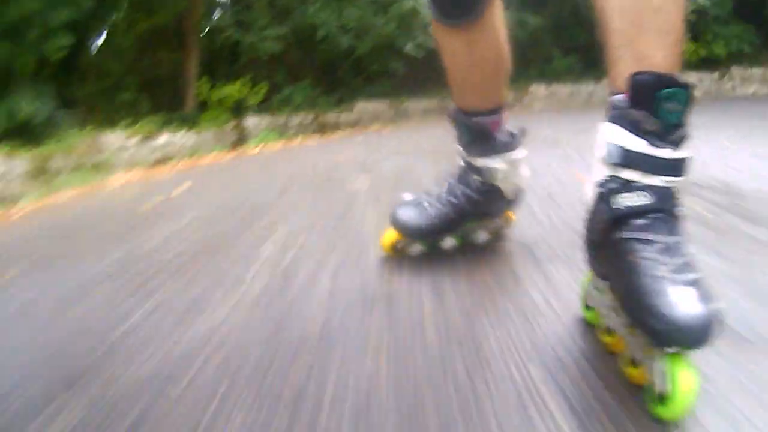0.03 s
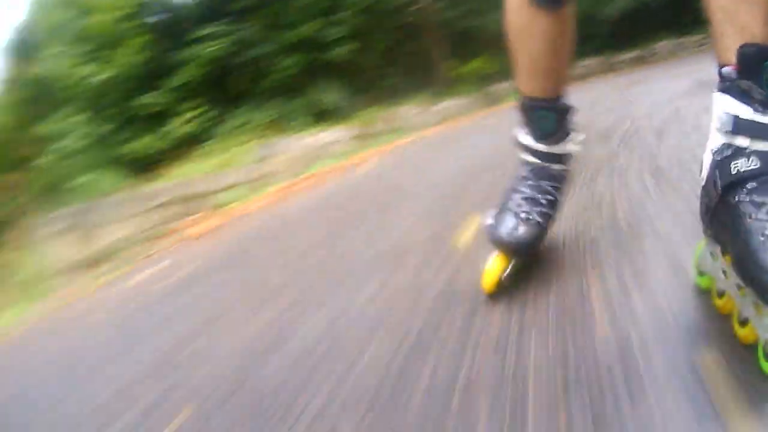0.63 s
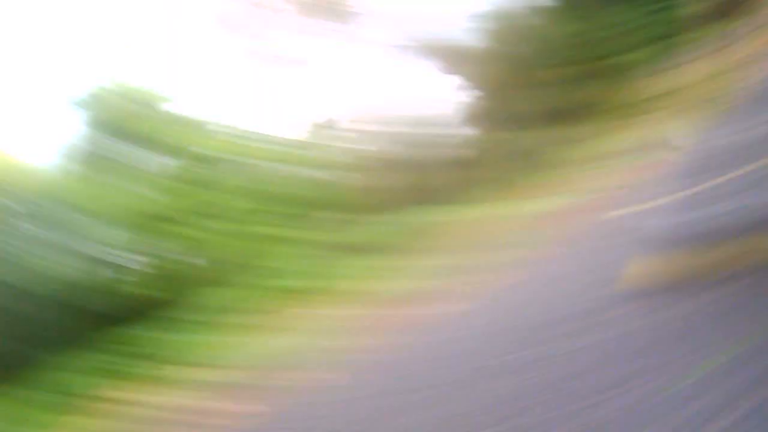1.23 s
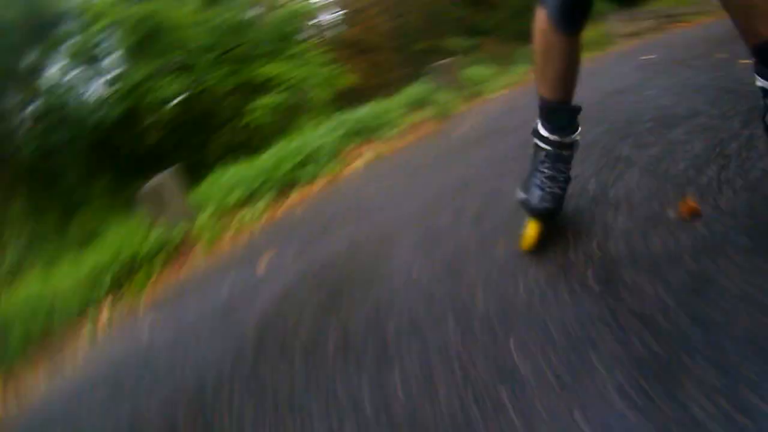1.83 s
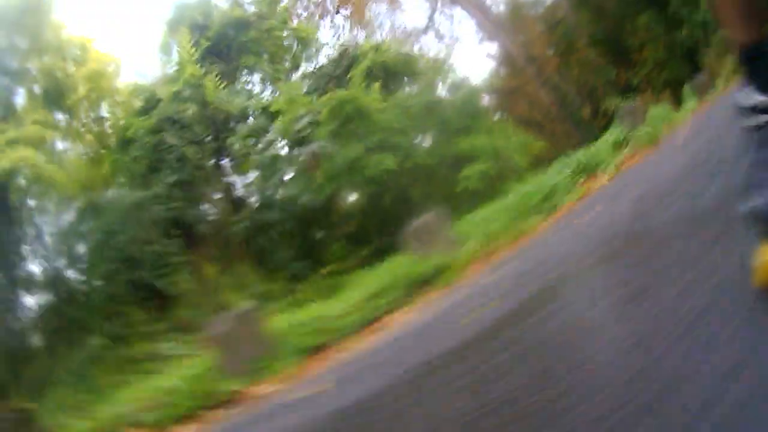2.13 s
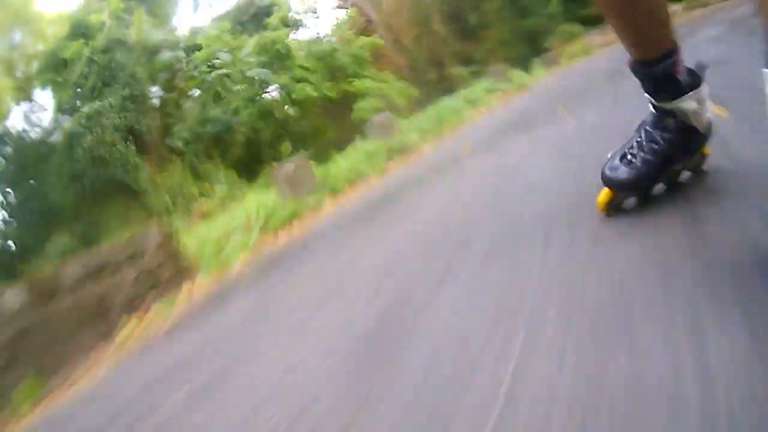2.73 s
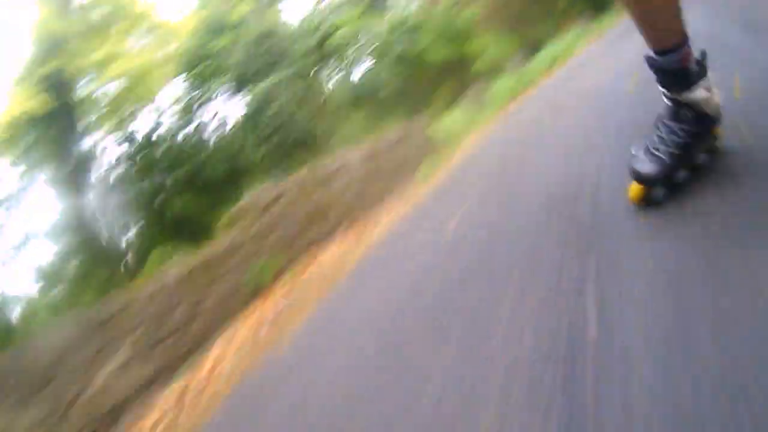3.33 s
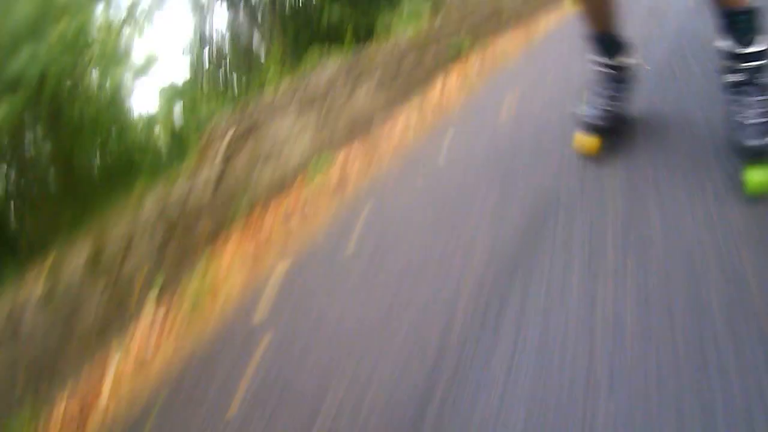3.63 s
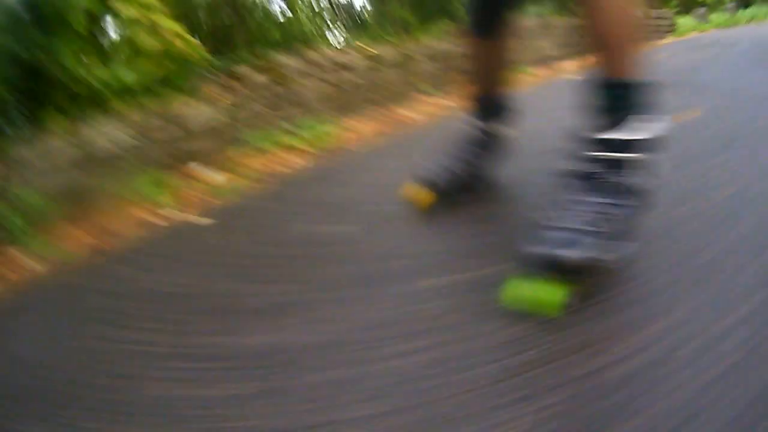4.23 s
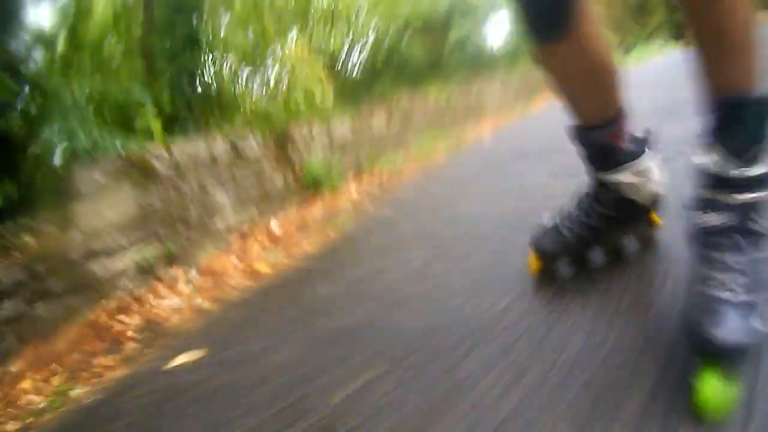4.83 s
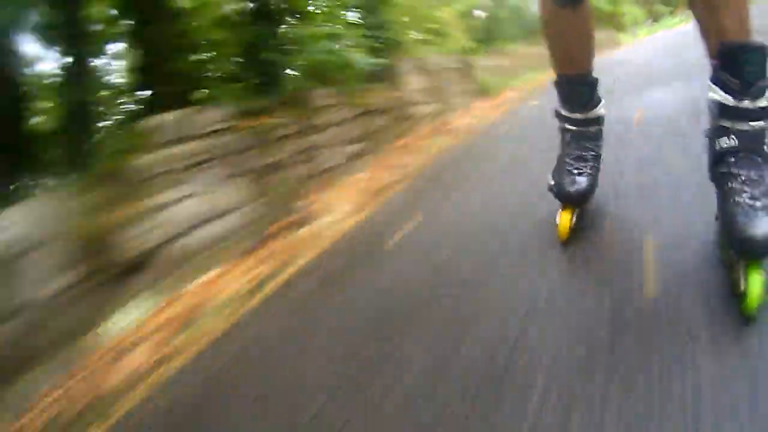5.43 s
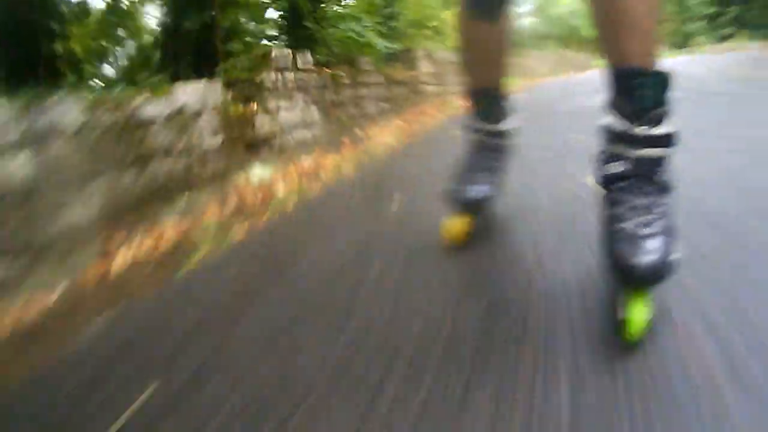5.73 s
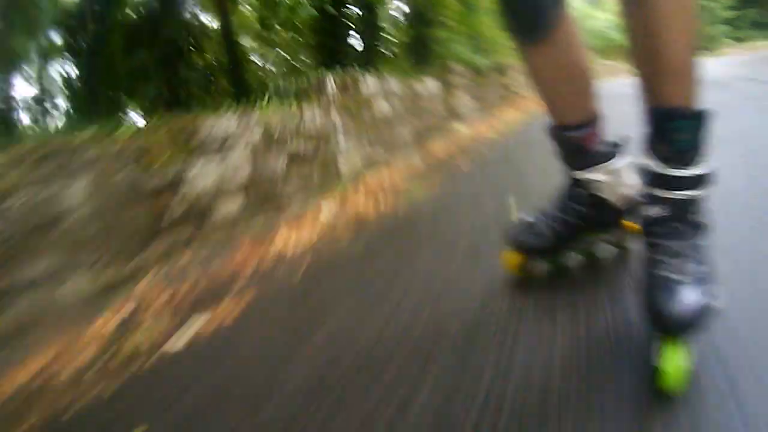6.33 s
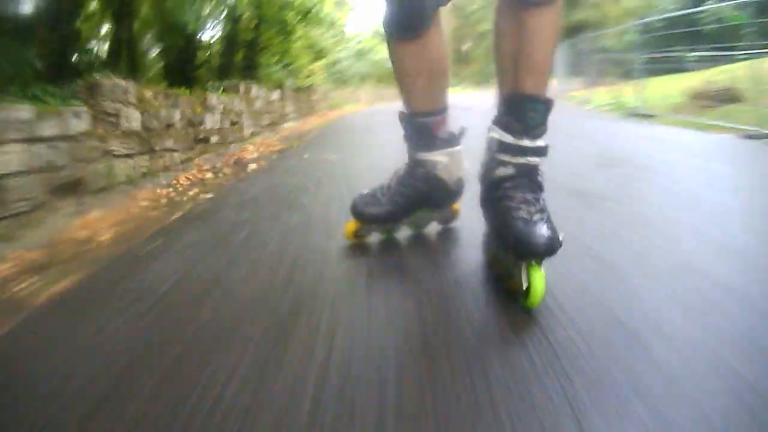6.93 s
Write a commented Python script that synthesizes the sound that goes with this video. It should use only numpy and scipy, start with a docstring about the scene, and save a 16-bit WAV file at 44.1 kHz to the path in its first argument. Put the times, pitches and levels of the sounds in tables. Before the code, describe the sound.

Inline skates roll on rough asphalt for about seven seconds, heard outdoors from a microphone held low on a pole. The sound is a continuous low rumble with a grainy wheel whir and a light high rattle, over a faint hiss. It swells with pushes near 0.7, 3.3 and 4 seconds and again from 5.5 to 6.3, easing as the weight shifts. Small stones tick under the wheels here and there, the loudest just before 6 seconds. Low wind shudder is present from the start and turns into deep, uneven buffeting from about 2.2 to 5.3 seconds. From around 2 seconds, a hand gives the grip occasional dull bumps, the clearest near 2.9. The pole's joint clicks in a quick cluster around 2.5 seconds and a few more times between 4.4 and 5. The skates are still rolling at the end.

```python
"""Inline skates roll down an asphalt path, heard from a microphone held low on a pole.
From the start, the rough road drums on the wheels and rings in frames and boots, louder with each push,
while the pole shudders in the passing air and the microphone hisses faintly.
Soon small stones tick under the wheels. From about 2 s, the hand bumps the grip and the pole's joint
clicks now and then. Near 6 s comes the loudest stone, during one of the last strong pushes."""
import sys
import numpy as np
from scipy import signal
from scipy.fft import rfft, irfft
from scipy.io import wavfile
from scipy.ndimage import uniform_filter1d

SR = 44100
rng = np.random.default_rng(int(sys.argv[2]) if len(sys.argv) > 2 else 0)


def unload_wav(signal):
    """Save mono or channel-first audio to the path in sys.argv[1] as 16-bit WAV at rate SR, clipped to [-1, 1]."""
    wavfile.write(
        sys.argv[1],
        SR,
        np.round(np.clip(np.atleast_2d(signal).T, -1, 1) * 32767).astype(np.int16),
    )


N = 317079
TIME = np.arange(N) / SR


def from_db(db):
    """Turn decibels into a number to multiply a sound by."""
    return 10 ** (np.asarray(db) / 20)


def unit_power(x):
    """Scale a signal so that its average power is 1."""
    return x / np.sqrt(np.mean(x ** 2) + 1e-20)


def low_pass(x, hz, order=2):
    """Dull a sound by turning down what lies above hz."""
    return signal.sosfilt(signal.butter(order, min(hz, .45 * SR), fs=SR, output="sos"), x)


def drift(rate_hz):
    """A slow random wobble, about 1 in size."""
    return unit_power(low_pass(rng.standard_normal(N + SR), rate_hz)[SR:])


def swells(rows):
    """Add smooth rises and dips into one curve, in dB."""
    return sum(db * np.exp(-((TIME - middle_s) / half_s) ** 2) for middle_s, half_s, db in rows)


def resonate(x, pitch_hz, width_hz):
    """Make a sound ring near one pitch; filtering twice sharpens the ring."""
    r = np.exp(-np.pi * width_hz / SR)
    gain = (1 - r * r) / 2
    section = [gain, 0, -gain, 1, -2 * r * np.cos(2 * np.pi * pitch_hz / SR), r * r]
    return signal.sosfilt([section, section], x + 1e-18)


def strike(rings, size=4096):
    """One blow with peak 1: each tone fades by 60 dB in its ring_s."""
    t = TIME[:size]
    pitch_hz, level_db, ring_s = np.transpose(rings)[:, :, None]
    # each tone's strength and sign depend on the spot that is hit, so they are left to chance
    strength = from_db(level_db + rng.standard_normal(pitch_hz.shape))
    strength *= rng.choice([-1, 1], pitch_hz.shape)
    fade = np.exp(-np.log(1000) * t / ring_s)
    blow = np.sum(strength * fade * np.sin(2 * np.pi * pitch_hz * t), axis=0)
    return blow / np.abs(blow).max()


def add(track, start_s, sound):
    """Mix a sound into a track at a given time."""
    start = round(start_s * SR)
    track[start:start + len(sound)] += sound[:N - start]


def road_grain(rings, per_s, spread_db):
    """Asphalt grains of uneven size hit the wheels; each hit shakes every ring differently."""
    hits = (rng.random(N) < per_s / SR) * from_db(spread_db * np.minimum(rng.exponential(1, N), 5))
    ringing = sum(from_db(db) * resonate(hits * rng.standard_normal(N), hz, width_hz)
                  for hz, width_hz, db in rings)
    return unit_power(ringing)


# How a boot rings: pitch_hz, width_hz, level_db
BOOT_RINGS = [(187, 198, 2), (441, 432, -2.5), (763, 55, -5.5)]

def boots(load_db, flutter):
    """The road shakes the boots into a low rumble."""
    rumble = road_grain(BOOT_RINGS, per_s=3000, spread_db=2.5)
    return from_db(-66 + 0.8 * load_db + flutter) * rumble


# How the frame that holds the wheels rings: pitch_hz, width_hz, level_db
FRAME_RINGS = [(2570, 290, -10), (2793, 320, -0.5), (3610, 740, -8), (4133, 430, -7.5), (4970, 280, -15.5)]

def frames(load_db, bright_db, flutter):
    """The road shakes the frames into a high rattle."""
    rattle = road_grain(FRAME_RINGS, per_s=6000, spread_db=3.5)
    return from_db(-78 + 0.91 * load_db + 0.09 * bright_db + 2.1 * flutter) * rattle


# How a wheel rings: pitch_hz, width_hz, level_db
WHEEL_RINGS = [(1030, 260, -1), (1135, 300, 0.5), (1408, 210, -9.5), (1685, 630, -15.5), (1998, 224, -15.5)]
# A wheel's low ring sings out or sinks for a while: middle_s, half_length_s, change_db
LOW_RING_SWELLS = [(1.84, 0.35, 6.5), (3.05, 0.11, 4.5), (4.35, 0.28, -9), (6.8, 0.5, 5.5)]
# Three single rings of a wheel: pitch_hz, width_hz, level_db
LOW_RING, HIGH_RING, SCRUB_RING = (1173, 146, 0), (2964, 290, 0), (5370, 500, 0)

def wheels(load_db, bright_db, flutter):
    """The road makes the wheels whir, sing low and high, and scrub."""
    whir = road_grain(WHEEL_RINGS, per_s=4000, spread_db=1.5)
    low = road_grain([LOW_RING], per_s=4000, spread_db=4.0)
    high = road_grain([HIGH_RING], per_s=1500, spread_db=1.1)
    scrub = road_grain([SCRUB_RING], per_s=5800, spread_db=4.3)
    whir *= from_db(-65.5 + 0.91 * load_db + flutter)
    low *= from_db(-70.5 + 0.37 * load_db + swells(LOW_RING_SWELLS))
    high *= from_db(-86 + 0.94 * load_db + bright_db + 2.7 * flutter)
    scrub *= from_db(-93 + 1.06 * load_db + 0.38 * bright_db + 2.0 * flutter)
    return whir + low + high + scrub


# The skater leans on the wheels: middle_s, half_length_s, rise_db
PUSHES = [(.73, 0.18, 3), (1.12, 0.05, 1.9), (1.96, 0.33, 0.4), (3.28, 0.2, 3.3), (4.07, 0.18, 4.9),
          (4.37, 0.088, 2), (5.5, .15, 2.5), (5.98, 0.24, 4.5), (6.28, 0.17, 3.5), (7.1, 0.1, 3)]
# The skates lighten as the weight shifts: middle_s, half_length_s, dip_db
LIFTS = [(.35, 0.29, 3), (2.68, 0.15, 3.5), (3.58, 0.06, 2), (4.8, 0.1, 2), (5.1, 0.12, 3.5),
         (6.179, 0.035, 8.5)]
# The bright ring comes and goes with the nearer skate: time_s, change_db
BRIGHTNESS = [(0, 11.5), (.5, 3), (1.05, 13), (1.95, 3.5), (2.3, 1), (2.7, -8), (3.6, -3), (4.0, -1),
              (4.6, -5), (5.1, 5), (5.95, 2.5), (6.6, -2), (7.19, 3.5)]

def rolling():
    """The skates grow louder under the skater's weight and flutter on the uneven road."""
    load_db = swells(PUSHES) - swells(LIFTS)
    bright_db = np.interp(TIME, *np.transpose(BRIGHTNESS))
    flutter = drift(rate_hz=30)
    return (boots(load_db, flutter) + frames(load_db, bright_db, flutter)
            + wheels(load_db, bright_db, flutter))


def sway(pitch_hz, width_hz):
    """A low shaking kept going by gusts, with its strength nearly evened out."""
    swing = resonate(rng.standard_normal(N + SR), pitch_hz, width_hz)[SR:]
    return swing / np.sqrt(uniform_filter1d(swing ** 2, size=4000) + 1e-18)


def jolt(start_s, rise_s=0.021, fall_s=0.071):
    """The swing after a jolt builds up quickly and dies away."""
    age_s = TIME - start_s
    return np.clip(age_s / rise_s, 0, 1) * np.exp(-np.maximum(age_s - rise_s, 0) / fall_s)


# How hard the passing air sways the pole: time_s, level_db
AIRSTREAM = [(0, -56.5), (.7, -53), (2.12, -54), (2.35, -39), (2.7, -50), (3.6, -49), (4.0, -44.5),
             (4.8, -46.5), (5.5, -52), (6.2, -50), (6.85, -57), (7.19, -50.5)]
# Jolts that set the pole swinging: start_s, deep_db, judder_db
JOLTS = [(2.225, -39.5, -44), (2.335, -30, -51), (2.48, -39.5, -48), (2.549, -36.5, -65), (2.78, -37, -68),
         (2.98, -37.5, -68), (3.12, -41, -52.5), (3.782, -34, -68), (3.96, -36, -55), (4.269, -35.5, -63),
         (4.458, -37, -53), (4.75, -45, -50.5), (5.08, -37, -66), (5.34, -44.5, -65), (5.85, -58, -55),
         (6.28, -54, -52.5)]

def pole_shudder(gust_hz=8.4, gust_db=2.5):
    """Gusts and jolts bend the pole in a deep sway and a faster judder, over a low rush of air."""
    air_db = np.interp(TIME, *np.transpose(AIRSTREAM))
    deep_gain = from_db(air_db + gust_db * drift(gust_hz))
    judder_gain = from_db(-64 + 0.35 * (air_db - air_db.mean()) + gust_db * drift(gust_hz))
    for start_s, deep_db, judder_db in JOLTS:
        swing = jolt(start_s)
        deep_gain = np.maximum(deep_gain, from_db(deep_db) * swing)
        judder_gain = np.maximum(judder_gain, from_db(judder_db) * swing)
    deep = deep_gain * (sway(39.9, width_hz=12.7) + from_db(-4) * sway(12.3, width_hz=21.7))
    judder = judder_gain * sway(114.8, width_hz=24)
    rush = from_db(-66.5 + 1.5 * drift(rate_hz=8.7)) * sway(83.7, width_hz=65)
    return low_pass(deep, hz=57.3, order=4) + judder + rush


# The tone of the hiss, from low to high: pitch_hz, relative_db
HISS_TONE = [(100, -2.5), (2000, -4.5), (6000, -2), (9000, -2), (13500, -3.5), (15000, -5.5), (15700, -14)]

def microphone_hiss(level_db=-78.5):
    """The microphone makes a faint, steady noise of its own."""
    pitch_hz, relative_db = np.transpose(HISS_TONE)
    every_hz = np.arange(N // 2 + 1) * SR / N
    tone = from_db(np.interp(np.log(every_hz + 1), np.log(pitch_hz), relative_db))
    hiss = irfft(rfft(rng.standard_normal(N)) * tone, N)
    return from_db(level_db) * unit_power(hiss)


# The larger stones under the wheels: start_s, kick_db, wheel_above_frame_db
STONES = [(0.5428, -60, -11), (1.336, -58, 7), (1.767, -50.5, -1), (1.979, -47.5, 1), (2.456, -52, -15),
          (2.8868, -52, 1), (2.9486, -57, -4), (3.1504, -50, -1), (3.74, -55.5, 9), (4.066, -48.5, 0),
          (4.3064, -53, -19), (5.352, -51, -20), (5.862, -41.5, 5.5), (5.877, -54, 7), (6.068, -54.5, 6),
          (6.2284, -52, 2)]

def stones(grit_per_s=3, tyre_hz=4460):
    """Each stone kicks frame and wheel once, dulled by the soft tyre; fine grit ticks at random."""
    track = np.zeros(N)
    # wide rings die away sooner
    frame = [(hz, db, 2.0 / width_hz) for hz, width_hz, db in FRAME_RINGS]
    wheel = [(hz, db, 2.6 / width_hz) for hz, width_hz, db in WHEEL_RINGS]
    grit_times = TIME[rng.random(N) < grit_per_s / SR]
    grit = [(start_s, rng.normal(-63, 0.5), 3.5) for start_s in grit_times]  # same columns as STONES
    for start_s, kick_db, wheel_above_frame_db in STONES + grit:
        tick = strike(frame) + from_db(wheel_above_frame_db) * strike(wheel)
        add(track, start_s, from_db(kick_db) * tick)
    return low_pass(track, tyre_hz)


# How the pole's grip rings: pitch_hz, level_db, ring_s
GRIP_RINGS = [(228, -12, 0.022), (472, -9, 0.024), (640, -9, 0.012), (800, -11, 0.0092),
              (1150, -12.5, 0.01)]
# The hand knocks the grip: start_s, level_db, slip_s
BUMPS = [(1.976, -47, .002), (2.5354, -44, .002), (2.911, -41.5, .013), (4.075, -49, .002),
         (4.511, -45, .002), (4.724, -50, .002), (5.249, -52, .002), (5.867, -52, .002),
         (6.2245, -50, .002)]

def grip_bumps(catch_every_s=0.0041):
    """The hand bumps the grip; in a longer slip it catches several times in a row."""
    track = np.zeros(N)
    for start_s, level_db, slip_s in BUMPS:
        for delay_s in np.arange(0, slip_s, catch_every_s):
            add(track, start_s + delay_s, from_db(level_db) * strike(GRIP_RINGS))
    return track


def crack(level_db=-15.5, fade_s=0.0064, size=4096):
    """The short, bright burst of noise as two parts meet."""
    return from_db(level_db) * rng.standard_normal(size) * np.exp(-np.log(1000) * TIME[:size] / fade_s)


# How the pole's joint rings: pitch_hz, level_db, ring_s
JOINT_RINGS = [(810, -10.5, 0.063), (1220, -8, 0.04), (1620, -2.5, 0.014), (1778, -1.5, 0.022),
               (2010, -6, 0.02), (3060, -5, 0.014), (3950, -6, 0.0066), (4000, 1, 0.0052),
               (4590, -9.5, 0.012), (7500, -4.5, 0.0025), (8800, -11.5, 0.0091)]
# The joint snaps: start_s, snap_db (before dulling), dull_above_hz, thud_db
CLICKS = [(2.1218, -46, 1200, -50), (2.5046, -36, 1200, -38), (2.5064, -33, 6000, -44.5),
          (2.509, -33.5, 5000, -44), (2.5712, -48.5, 3000, -62), (2.7277, -35.5, 1700, -55),
          (4.3825, -31, 1200, -44.5), (4.386, -42.5, 1500, -54), (4.7088, -37, 700, -63),
          (4.9786, -44, 1100, -51)]

def joint_clicks():
    """The pole's joint snaps, duller when the contact is soft, and thuds through the grip."""
    track = np.zeros(N)
    for start_s, snap_db, dull_above_hz, thud_db in CLICKS:
        snap = low_pass(strike(JOINT_RINGS) + crack(), dull_above_hz, order=1)
        thud = strike(GRIP_RINGS)
        add(track, start_s, from_db(snap_db) * snap + from_db(thud_db) * thud)
    return track


def scene():
    """Skates and pole in the open air, in one channel."""
    skates = rolling() + stones()
    pole = pole_shudder() + joint_clicks() + grip_bumps()
    return (skates + pole + microphone_hiss())[None]


def record(dry, cutoff_hz=15700):
    """The very highest treble is cut off steeply."""
    return signal.sosfilt(signal.ellip(10, .1, 70, cutoff_hz, fs=SR, output="sos"), dry)


dry = scene()
out = record(dry)
unload_wav(out)
```